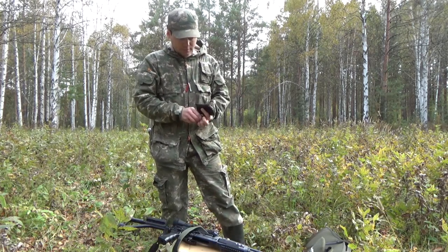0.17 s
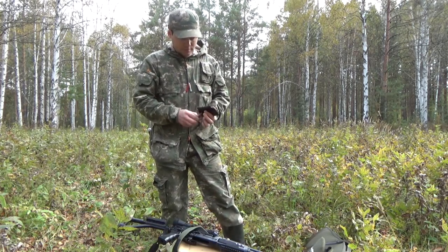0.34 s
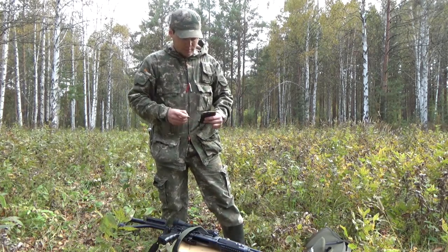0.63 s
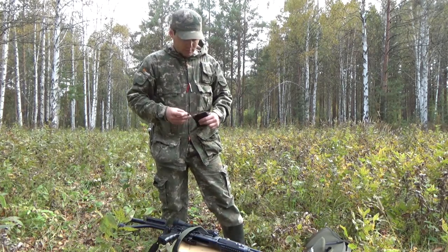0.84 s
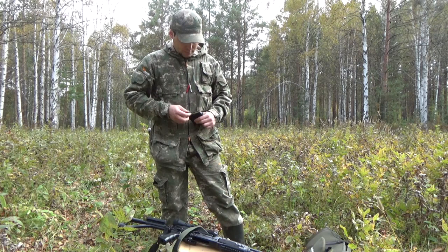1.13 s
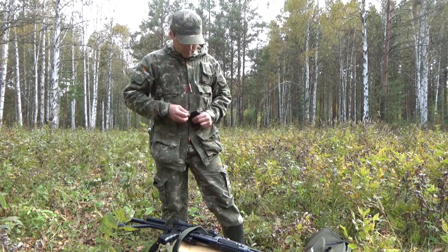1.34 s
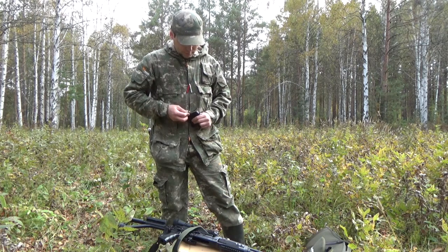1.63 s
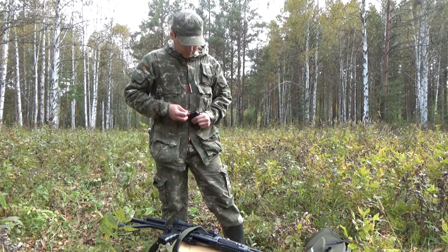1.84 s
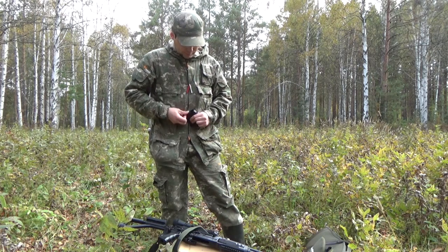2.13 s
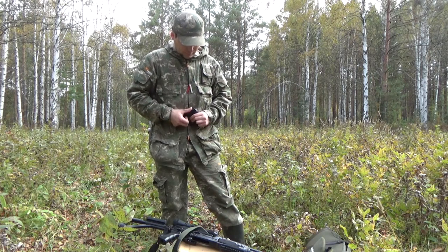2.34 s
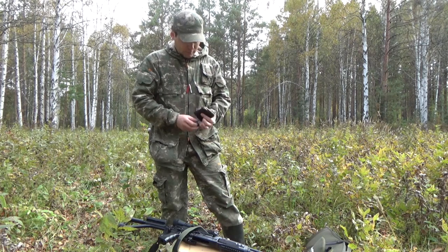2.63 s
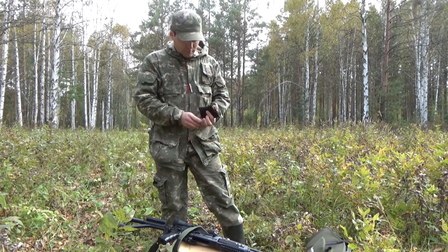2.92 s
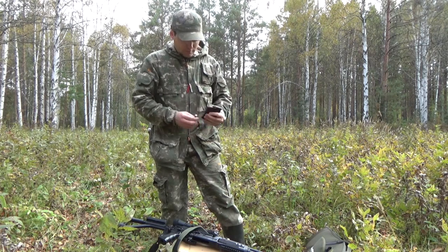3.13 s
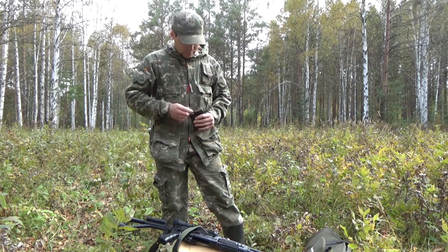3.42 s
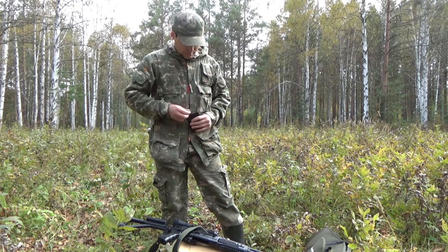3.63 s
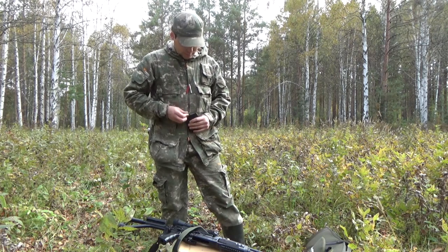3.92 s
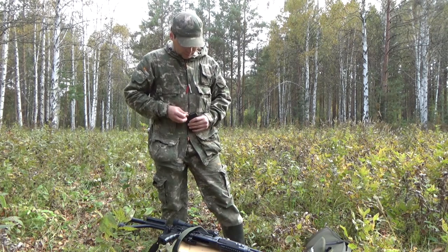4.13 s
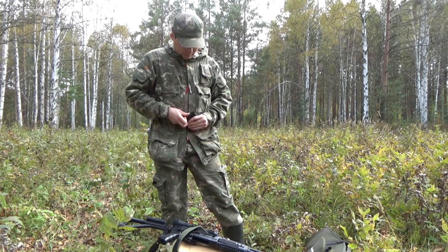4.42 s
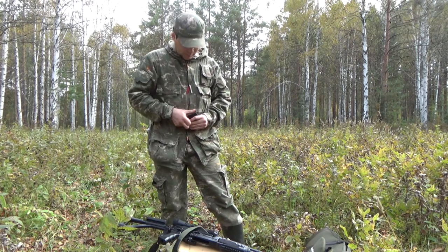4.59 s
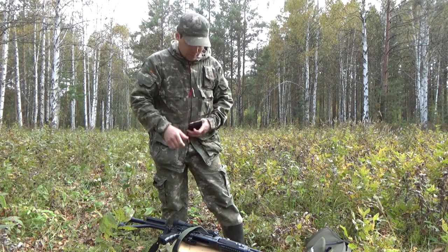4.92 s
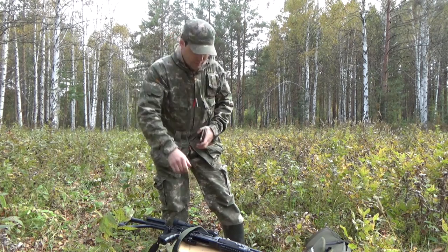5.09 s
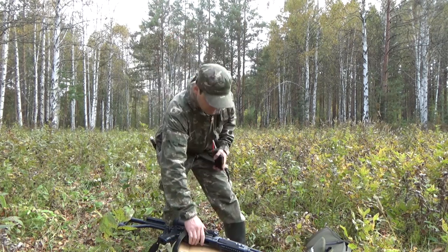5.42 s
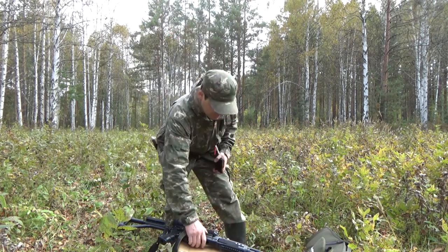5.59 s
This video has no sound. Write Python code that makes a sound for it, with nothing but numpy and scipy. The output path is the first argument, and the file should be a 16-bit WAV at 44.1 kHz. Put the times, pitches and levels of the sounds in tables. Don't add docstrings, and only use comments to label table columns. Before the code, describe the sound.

A man in a stiff jacket loads cartridges into a steel magazine at a forest edge. Light taps come first, then a tight burst of bright snaps and short scrapes just after two seconds, a quieter gap with one sharp click, and a second busier burst past four seconds. Sleeves rustle afterwards. A camera microphone a few metres away catches soft tree hush and its own very faint ticking.

```python
import sys
import numpy as np
from scipy import signal
from scipy.fft import rfft, irfft, next_fast_len
from scipy.io import wavfile
from scipy.ndimage import map_coordinates

SR = 44100
rng = np.random.default_rng(int(sys.argv[2]) if len(sys.argv) > 2 else 0)


def to_wav(sig):
    pcm = np.clip(np.atleast_2d(sig), -1, 1) * 32767
    pcm = np.round(pcm).astype(np.int16)
    wavfile.write(sys.argv[1], SR, pcm.T)


def invert_db(level):
    return 10 ** (np.asarray(level, dtype=float) / 20)


N = 253575

# frequency in Hz, level in dB per Hz.
FOREST_COLOUR = [(15, -44), (25, -13), (45, -6), (72, -0.5), (137, -11.5), (290, -5.5), (420, -5),
                 (650, -8.5), (1090, -10.5), (1650, -18), (3200, -18), (4900, -20.5), (9000, -26),
                 (15500, -32)]
# frequency in Hz, likeness from 0 to 1.
FOREST_LIKENESS = [(60, 1), (130, 0.95), (290, 0.9), (640, 0.79), (1400, 0.17), (3100, 0.55), (6800, 0.58),
                   (10000, 1)]
# middle in seconds, length in seconds, folds in dB, swish over folds in dB.
ARM_MOVES = [(0.01, .2, -65.5, -7), (.4, 0.25, -71, -4), (1.8, 0.6, -69, -14), (2.278, 0.13, -55.5, -11),
             (2.495, 0.17, -58, -2), (2.76, 0.17, -61.5, -6.5), (3.1, 0.48, -78, 2),
             (4.413, 0.76, -61, -12), (4.69, 0.16, -60.5, -3), (4.865, 0.29, -65, -1.5),
             (5.084, 0.28, -62.5, -5), (5.224, 0.19, -66, 1), (5.382, 0.19, -63.5, 4),
             (5.54, 0.1, -64.5, 0), (5.678, 0.17, -64.5, -1.5)]
# frequency in Hz, level in dB per Hz.
SWISH_COLOUR = [(3000, -30), (6000, -8), (8500, -1.5), (11000, -5.5), (15000, -22)]
# frequency in Hz, level in dB per Hz.
FOLD_COLOUR = [(600, -12.5), (1500, -3.5), (3000, -1.5), (5000, -5), (8000, -21.5)]
# frequency in Hz, level in dB, decay by 60 dB in seconds.
DRIVE_MODES = [(4910, -59.5, 0.027), (4800, -64, 0.024), (3420, -61.5, 0.033), (2900, -63, 0.026)]
# time in seconds, peak in dB, loudest case mode in Hz,
# rims over it in dB, box over it in dB.
LOOSE_TAPS = [(0.158, -29.5, 2400, -7, -7), (0.3323, -36, 1510, -20, -2), (1.2697, -26.5, 4400, -3, -13),
              (1.2701, -32.5, 3800, -3.5, -25), (1.4704, -34.5, 2600, -1, -2.5),
              (1.644, -36, 1570, -8.5, -25), (1.8177, -43, 2010, -20, -25), (1.8478, -39.5, 2020, -6, 0),
              (2.7475, -45, 3420, -15, -25), (3.8099, -18, 4320, -6, -29.5),
              (3.8357, -28, 2890, -15.5, -25), (3.872, -49, 3480, -15, -25),
              (4.9243, -38.5, 2860, -3.5, -5.5), (5.032, -36.5, 3460, -20, -25), (5.249, -62, 2000, -10, 7),
              (5.6056, -51, 3320, -5, -20)]
# time in seconds, peak in dB, loudest case mode in Hz,
# rims over it in dB, box over it in dB.
FIRST_PUSH = [(1.9761, -26.5, 3430, -7.5, -22), (1.9791, -28.5, 3500, -7.5, 2),
              (2.032, -38.5, 3040, -2.5, -1), (2.0504, -31.5, 3030, -10, -5), (2.068, -30, 2970, -9, -1),
              (2.077, -42, 2950, -15, -18), (2.1722, -40, 2830, -3, 2), (2.182, -7.5, 3850, -5, -24),
              (2.201, -25.5, 2920, -10.5, -11), (2.2892, -30, 1940, -6, -19),
              (2.2965, -16.5, 2900, -3.5, -13), (2.3525, -28.5, 2160, -14.5, -21),
              (2.3671, -23.5, 2260, -18.5, -5), (2.3698, -12.5, 2240, -2, -25),
              (2.3709, -12.5, 2060, -8, -36), (2.3806, -30.5, 1940, -11, 0), (2.402, -37, 2140, -18, 0),
              (2.4125, -19, 2230, -2.5, -11.5)]
# time in seconds, peak in dB, loudest case mode in Hz,
# rims over it in dB, box over it in dB.
SECOND_PUSH = [(4.1923, -46, 4100, -15, -25), (4.2113, -30.5, 3600, -15, -21),
               (4.239, -18.5, 3330, -15.5, -12), (4.2462, -13.5, 4440, -0.5, -15.5),
               (4.2485, -23, 3930, 1, -9.5), (4.3123, -35.5, 4800, -10, -27), (4.348, -50, 2500, -20, 5),
               (4.352, -40.5, 4890, -2, -25), (4.3915, -19.5, 2550, -6.5, -13),
               (4.4319, -17.5, 2360, -18.5, -23), (4.4451, -12, 4570, 1, -25), (4.4494, -10, 3700, -8, -30),
               (4.4744, -35, 4630, -3, -25), (4.4799, -24.5, 3740, -2.5, -23),
               (4.578, -29, 4840, -22, -15.5), (4.5937, -29, 2150, -13, -9.5),
               (4.612, -33.5, 3240, -20, -25), (4.6172, -27, 1800, -17, -15.5),
               (4.6515, -13, 2625, -3.5, -22.5), (4.6683, -38.5, 2370, -9, 5)]
# time in seconds, peak in dB, loudest rim mode in Hz,
# case walls over it in dB.
RIM_TICKS = [(0.447, -49.5, 6900, -1), (0.669, -48.5, 12500, -8), (2.8197, -48.5, 8400, -7),
             (3.161, -48, 6540, 3), (3.2245, -43, 6460, -6), (3.5504, -47.5, 7600, 1),
             (5.1598, -42, 10360, -12), (5.317, -43.5, 7720, -9), (5.352, -48, 8500, -13),
             (5.388, -51, 9000, -15), (5.495, -46, 8200, -13), (5.54, -47, 7540, -15)]
# time in seconds, second case mode in Hz, its level
# in dB, loudest rim mode in Hz, next rim mode in Hz.
HARD_SNAPS = [(0.158, 3680, -6, 7500, 7850), (1.2697, 2230, 0.5, 6350, 6400),
              (1.4704, 3240, -1, 6350, 6820), (1.644, 3930, -3.5, 7640, 8340),
              (1.8478, 3840, -1, 7670, 6060), (1.9761, 5660, -11, 5800, 8250),
              (1.9791, 1610, -7, 8850, 5810), (2.182, 2825, 1, 7260, 7770), (2.2965, 3370, -5, 7330, 10000),
              (2.3698, 2640, -4.5, 8660, 8100), (2.3709, 2460, -2.5, 7160, 6400),
              (2.4125, 3150, 0.5, 8300, 7640), (3.8099, 3630, -8, 7800, 9900),
              (4.2462, 4090, 8, 8580, 6320), (4.2485, 4590, -7, 8440, 6420),
              (4.3915, 2970, -4, 6080, 10150), (4.4451, 2050, -4, 7350, 11080),
              (4.4494, 4650, -8, 6150, 7580), (4.4799, 3000, 6, 5930, 8240), (4.6515, 3100, 1, 9550, 8860)]
# frequency in Hz, level in dB.
WALL_MODES = [(1700, -8), (2030, 0.5), (2400, -3.5), (2820, -1), (3300, -2), (3800, 3.5), (4300, -4.5),
              (4750, -1.5), (5400, -4.5)]
# frequency in Hz, level in dB.
RIM_MODES = [(6150, 4.5), (6800, -0.5), (7450, 0), (8100, -0.5), (8800, 1), (9600, 1), (10400, -4),
             (11200, -3), (12100, -6.5), (13200, -8)]
# time in seconds, level in dB, low box tone in Hz.
BOX_KNOCKS = [(0.158, -55, 700), (0.332, -49, 700), (1.472, -54, 760), (1.975, -41.5, 406),
              (2.201, -45, 670), (2.199, -39.5, 400), (2.295, -49, 358), (2.367, -40, 350),
              (2.412, -38.5, 390), (4.244, -39.5, 400), (4.389, -37, 397), (4.476, -50, 415),
              (4.668, -40, 412)]
# start in seconds, end in seconds, level in dB, centre in Hz,
# loudest point as a share of the stroke.
LIP_SCRAPES = [(0.222, .295, -55.5, 1280, 0.58), (1.96, 1.982, -48.5, 2980, 0.84),
               (2.024, 2.078, -43, 2230, 0.7), (2.166, 2.179, -47, 2800, 0.7),
               (2.185, 2.24, -43.5, 2880, 0.1), (2.36, 2.391, -39, 2200, 0.34),
               (4.216, 4.236, -49, 3480, .85), (4.244, 4.261, -31, 3800, 0.2),
               (4.365, 4.402, -43.5, 3000, 0.78), (4.437, 4.466, -50, 3500, 0.28),
               (4.554, 4.608, -44, 2850, 0.49), (4.603, 4.62, -49, 3000, .5), (4.639, 4.68, -50, 2500, .3)]
# frequency in Hz, gain in dB.
MICROPHONE_TREBLE = [(12000, 0), (14000, -2), (15500, -7), (16700, -32)]
# frequency in Hz, level in dB.
PORT_DIFFERENCE = [(300, -34), (1200, -16.5), (2400, -20), (4400, -24.5), (8000, -15.5), (11000, -25)]

# (case t60 in s, box tone in Hz, box t60 in s)
LOOSE, GRIP_FIRST, GRIP_SECOND = (0.016, 1044, 0.021), (0.012, 1113, 0.016), (0.012, 1245, 0.019)
RIM_T60_S, RIM_LOW_HZ, RIM_HIGH_HZ = 0.012, 6070, 9000
LINGER_DB, LINGER_T60_S = -31, 0.06


def unit(x):
    return x / np.sqrt(np.mean(x ** 2) + 1e-20)


def along(points, hz):
    f, v = np.transpose(points)
    return np.interp(np.log(hz + 1), np.log(f + 1), v)


def wobble(rate):
    knots = rng.standard_normal(int(N * rate / SR) + 4)
    return map_coordinates(knots, [np.arange(N) * rate / SR])


def filtered(x, response):
    m = next_fast_len(x.shape[-1] + 8192)
    return irfft(rfft(x, m) * response(np.fft.rfftfreq(m, 1 / SR)), m)[..., :x.shape[-1]]


def rush(spectrum, alike):
    def mid_side(hz):
        turn = np.arccos(np.clip(along(alike, hz), -1, 1)) / 2
        return invert_db(along(spectrum, hz)) * [np.cos(turn), np.sin(turn)]

    mid, side = filtered(rng.standard_normal((2, N)), mid_side)
    return unit(np.array([mid + side, mid - side]))


def add(out, s, db, sound):
    out[round(s * SR):][:len(sound)] += invert_db(db) * sound / np.abs(sound).max()


def onset(t, rise_s):
    return 1 - np.exp(-t / rise_s)


def ring(modes, t, t60, spread_db):
    hz, db = np.transpose(modes)[:, :, None]
    level, detune, start = rng.standard_normal((3, len(modes), 1))
    tuned_hz = hz * (1 + 0.028 * detune * (spread_db > 0))
    tones = invert_db(db + spread_db * level) * np.sin(2 * np.pi * (tuned_hz * t + 0.082 * start))
    x = tones.sum(0) * invert_db(-60 * (t / np.clip(t60, 0.003, 0.08)) ** 1.1)
    return x / np.linalg.norm(x)


def forest():
    return invert_db(-58.5 + 0.58 * wobble(2.265)) * rush(FOREST_COLOUR, FOREST_LIKENESS)


def jacket():
    middle, length, folds_db, over_db = np.transpose(ARM_MOVES)[:, :, None]
    late = (np.arange(N) / SR - middle) / length
    swell = np.exp(-np.where(late < 0, 4 * late ** 2, 2.36 * np.abs(late) ** 1.4))

    def gain(db, rest_db):
        return np.sqrt(((invert_db(db) * swell) ** 2).sum(0) + invert_db(rest_db) ** 2)

    swish_grain = unit(invert_db(1.3 * wobble(45) + 2.2 * wobble(300)))
    swish = gain(folds_db + over_db, rest_db=-82) * swish_grain * rush(SWISH_COLOUR, [(8000, 0.97)])
    fold_grain = unit(invert_db(3.0 * wobble(30) + 2.5 * wobble(200)))
    folds = gain(folds_db, rest_db=-73.5) * fold_grain * rush(FOLD_COLOUR, [(3000, 0.92)])
    return swish + folds


def drive():
    ticks, t = np.zeros(N), np.arange(SR // 25) / SR
    at = np.arange(round(0.0047 * SR), N, SR // 25)
    weaker = np.arange(len(at)) % 2 == 1
    ticks[at] = invert_db(-2.5 * weaker + 1.1 * rng.standard_normal(len(at)))
    tick = sum(invert_db(db - 60 * t / t60) * np.sin(2 * np.pi * hz * t) for hz, db, t60 in DRIVE_MODES)
    return signal.fftconvolve(ticks, tick * onset(t, 0.00078))[:N]


def contacts():
    phases = (LOOSE_TAPS, LOOSE), (FIRST_PUSH, GRIP_FIRST), (SECOND_PUSH, GRIP_SECOND)
    pushes = [(*row, *grip) for rows, grip in phases for row in rows]
    cases = [(s, db, hz, t60) for s, db, hz, _, _, t60, _, _ in pushes]
    cases += [(s, db + walls_db, 3300, LOOSE[0]) for s, db, _, walls_db in RIM_TICKS]
    rim_pairs = RIM_LOW_HZ + (RIM_HIGH_HZ - RIM_LOW_HZ) * rng.random((len(pushes), 2))
    partners = [(hz * 1.195 if hz < 3450 else hz / 1.195, -5) for _, _, hz, _ in cases]
    for s, next_hz, next_db, *rim_pair in HARD_SNAPS:
        k = np.argmin([abs(push[0] - s) for push in pushes])
        partners[k], rim_pairs[k] = (next_hz, next_db), rim_pair
    walls = [(*case, *partner) for case, partner in zip(cases, partners)]
    rims = [(p[0], p[1] + p[3], *pair) for p, pair in zip(pushes, rim_pairs)]
    rims += [(s, db, hz, 1.2 * hz) for s, db, hz, _ in RIM_TICKS]
    box = [(s, db + box_db, hz, t60) for s, db, _, _, box_db, _, hz, t60 in pushes]
    return walls, rims, box


def wall_click(t, hz, t60, next_hz, next_db):
    pair = ring([(hz, 0), (next_hz, next_db)], t, 0.79 * t60, 0)

    def band(f):
        return (1j * f * hz / (hz * next_hz - f * f + 1j * f * 1.23 * hz)) ** 2

    grit = filtered(rng.standard_normal(len(t)), band) * invert_db(-60 * t / (0.65 * t60))
    grit = grit / np.linalg.norm(grit)
    family = []
    for mode_hz, level in WALL_MODES:
        fall = 15 if mode_hz < min(hz, next_hz) else 11
        octaves = abs(np.log2(mode_hz / np.sqrt(hz * next_hz)))
        family.append((mode_hz, level - fall * octaves))
    rest = invert_db(-1.0) * ring(family, t, 0.77 * t60, spread_db=6.5)
    return onset(t, 0.00023) * (pair + rest + invert_db(-9) * grit)


def rim_click(t, hz, next_hz):
    pair = ring([(hz, 0), (next_hz, -2.5)], t, 0.79 * RIM_T60_S, 0)
    crack = np.diff(rng.standard_normal(len(t) + 1)) * invert_db(-60 * t / 0.0039)
    rest = invert_db(2.0) * ring(RIM_MODES, t, 0.68 * RIM_T60_S, spread_db=3)
    return onset(t, 0.0001) * (pair + rest + invert_db(-10) * crack / np.linalg.norm(crack))


def box_click(t, hz, t60):
    side_modes = ring([(0.654 * hz, -4), (1.332 * hz, -1.5)], t, 0.83 * t60, spread_db=2.0)
    return onset(t, 0.00092) * (ring([(hz, 0)], t, 0.77 * t60, 0) + invert_db(-3.0) * side_modes)


def clicks():
    out, t = np.zeros(N + SR), np.arange(SR // 10) / SR
    walls, rims, box = contacts()
    for s, db, *modes in walls:
        add(out, s, db, wall_click(t, *modes))
        linger = onset(t, 0.0025) * ring(WALL_MODES, t, LINGER_T60_S, spread_db=3.5)
        add(out, s, db + LINGER_DB, linger)
    for s, db, *pair in rims:
        add(out, s, db, rim_click(t, *pair))
    for s, db, *tone in box:
        add(out, s, db, box_click(t, *tone))
    return out[:N]


def knocks():
    out, t = np.zeros(N + SR), np.arange(SR // 20) / SR
    for s, db, hz in BOX_KNOCKS:
        fade = invert_db(db + 10.5 - 60 * t / 0.021)
        out[round(s * SR):][:len(t)] += fade * onset(t, 0.00064) * np.sin(2 * np.pi * hz * t)
    return out[:N]


def scrapes():
    def peak(f, centre, width):
        return 1j * f * width / (centre * centre - f * f + 1j * f * width)

    out = np.zeros(N)
    for start, end, db, centre_hz, loudest in LIP_SCRAPES:
        a, b = round(start * SR), round(end * SR)
        grains = rng.standard_normal(b - a) * invert_db(5.5 * wobble(1200)[a:b])
        band = lambda f: peak(f, centre_hz, 1.55 * centre_hz) ** 2 + invert_db(-27) * peak(f, 7300, 3500) ** 2
        crest = np.clip(loudest, 0.05, 0.95)
        stroke = np.interp(np.linspace(0, 1, b - a), [0, crest, 1], [0, 1, 0]) ** 1.01
        out[a:b] += invert_db(db) * unit(filtered(grains, band)) * stroke
    return out


def ground(x):
    t = np.arange(SR // 3) / SR
    near = invert_db(-60 - 60 * t / 0.07)
    far = invert_db(-78 - 60 * t / 0.5) * (t > 0.02)
    scatter = rng.standard_normal((2, len(t))) * (near + far) * (t > 0.002)
    tail = filtered(scatter, lambda f: 1 / (1 + 1j * f / 7000))
    return signal.fftconvolve(x[None], tail, axes=1)[:, :N]


def ports(x):
    side = filtered(x, lambda f: invert_db(along(PORT_DIFFERENCE, f)) * np.exp(1.25j))
    return np.array([x + side, x - side])


def surroundings(f):
    lean_db = along([(400, 0), (2400, 0.56), (8000, 0.67), (14000, 0)], f)
    return invert_db(lean_db * np.array([[1], [-1]])) * invert_db(-24 * (f > 15950))


def microphone(f):
    return invert_db(along(MICROPHONE_TREBLE, f)) * (1j * f / (1j * f + 200)) ** 2


def scene():
    metal = filtered(clicks() + knocks() + scrapes(), microphone)
    hush = forest()
    near = ports(metal) + ground(metal)
    return near + filtered(jacket() + drive() + hush, surroundings)


def low_pass(x):
    return signal.sosfilt(signal.butter(12, 16760, fs=SR, output="sos"), x)


def record(dry):
    return low_pass(dry)


dry = scene()
out = record(dry)
to_wav(out)
```